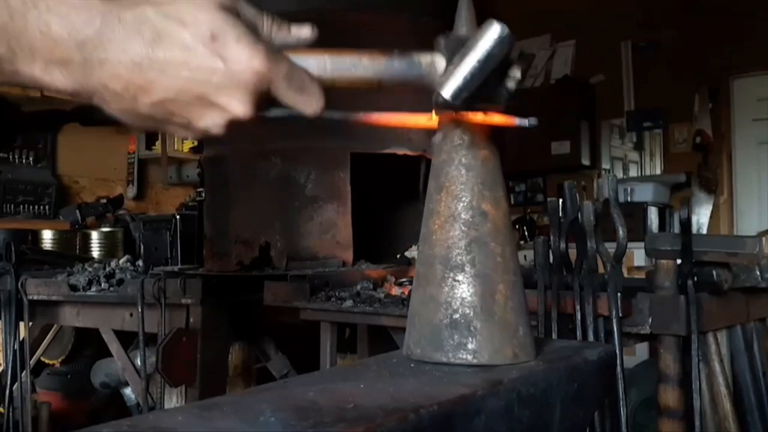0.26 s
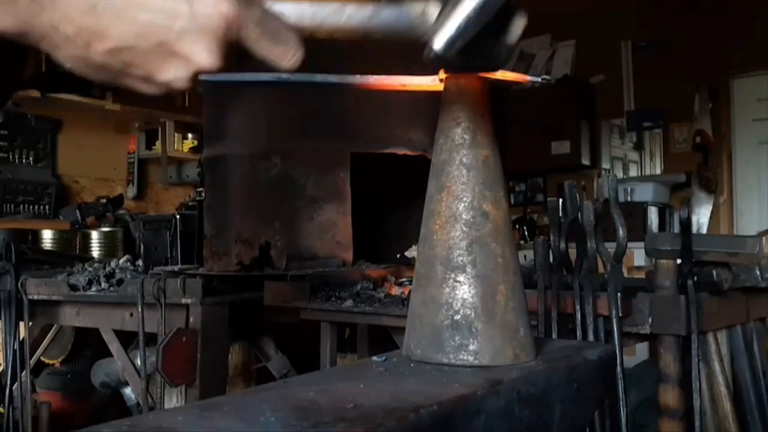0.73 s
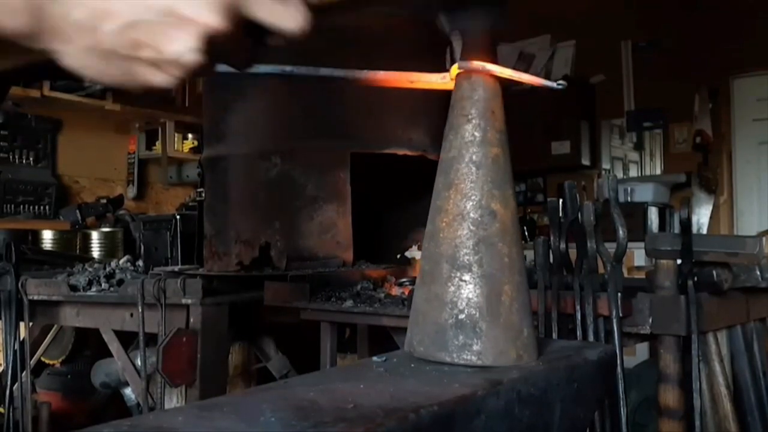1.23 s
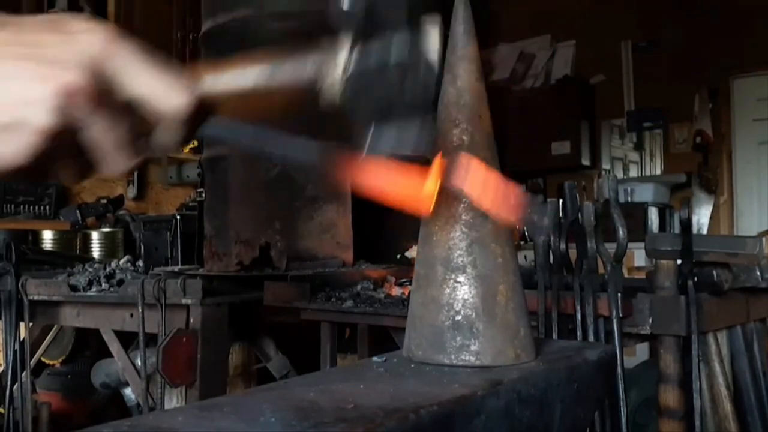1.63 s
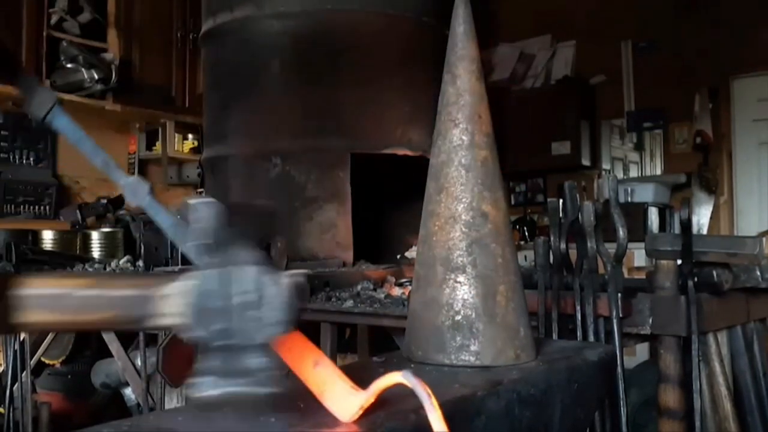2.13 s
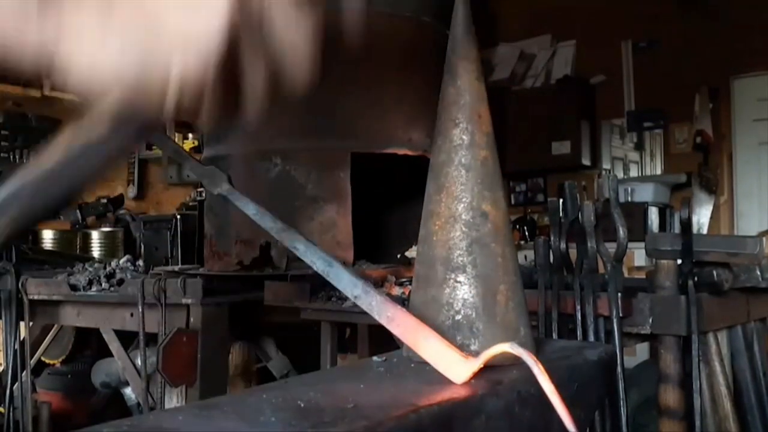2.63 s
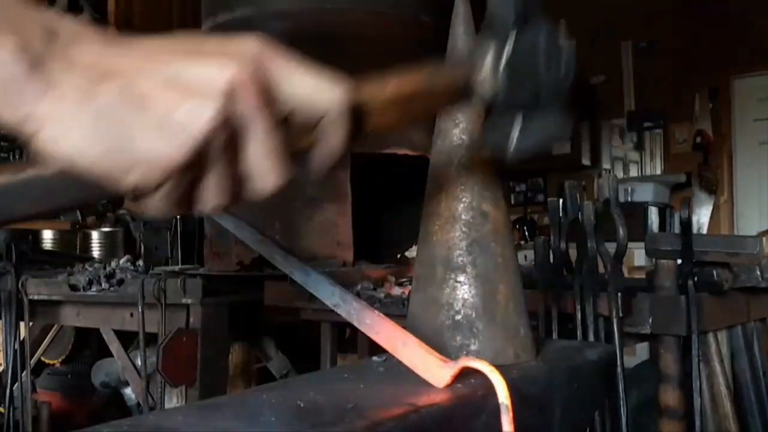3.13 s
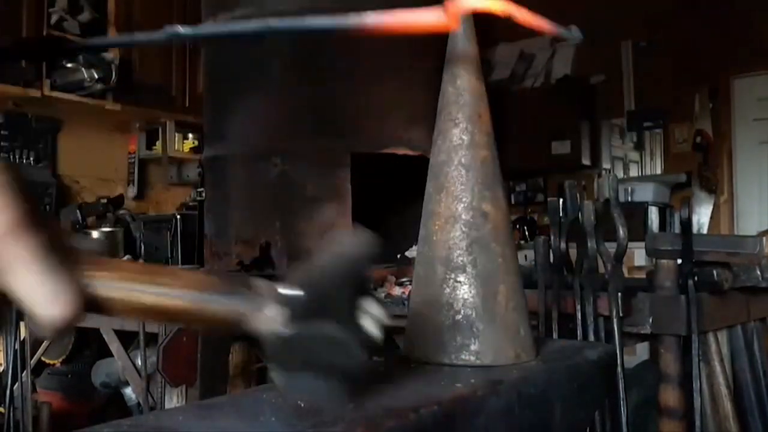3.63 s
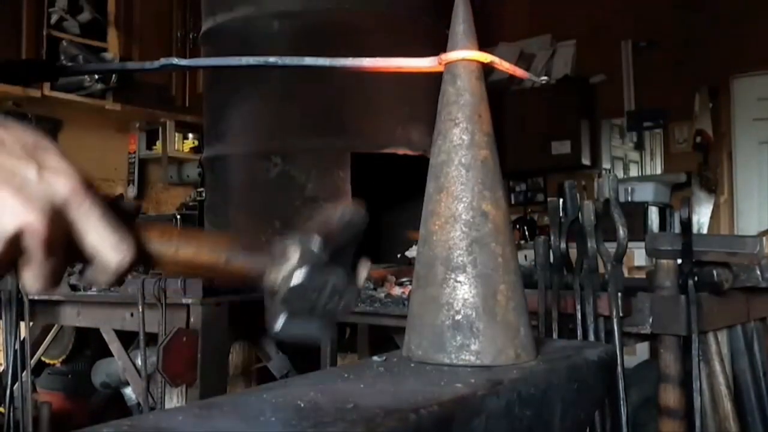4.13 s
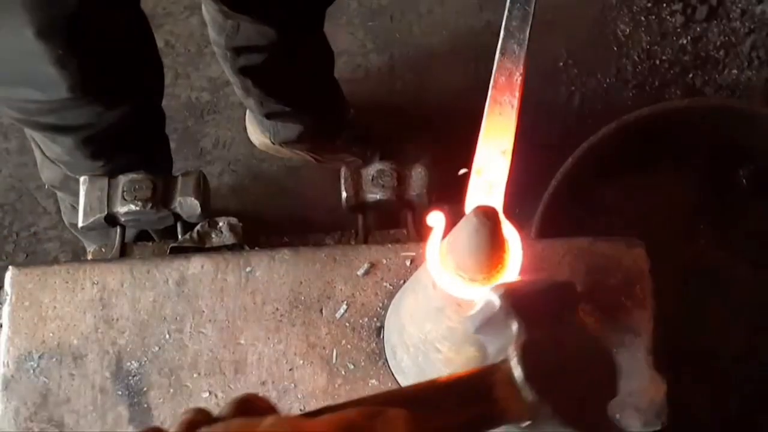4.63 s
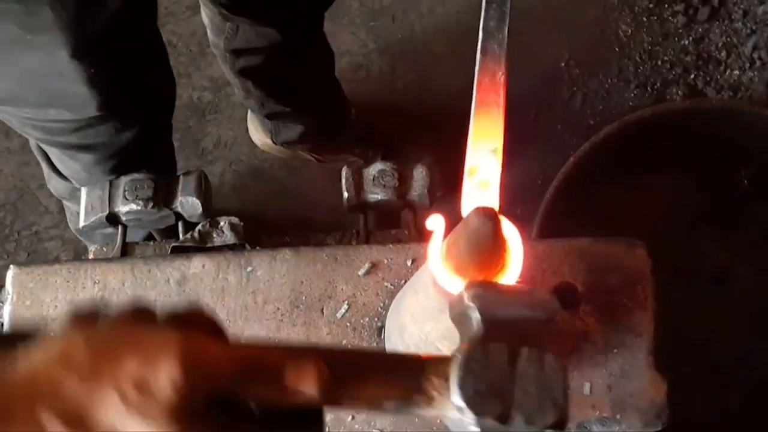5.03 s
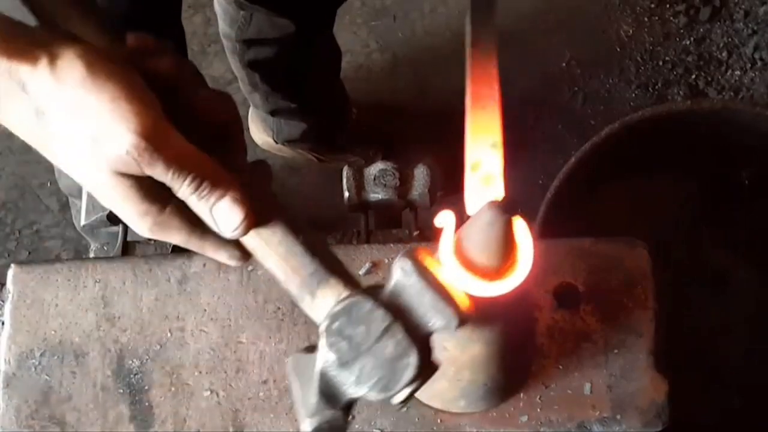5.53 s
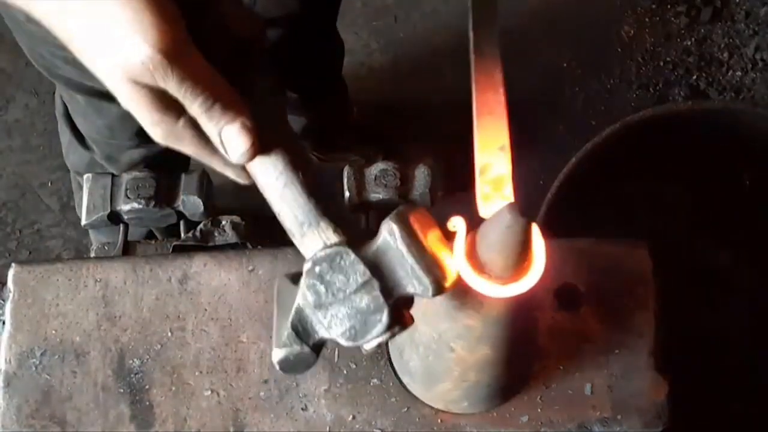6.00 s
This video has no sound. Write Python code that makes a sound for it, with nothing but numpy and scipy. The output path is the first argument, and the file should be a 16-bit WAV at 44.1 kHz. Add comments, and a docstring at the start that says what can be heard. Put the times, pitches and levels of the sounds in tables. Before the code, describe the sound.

Steel scrapes and knocks on a stand, then one hard ringing hammer blow, a bouncing run of ringing strikes, and lighter taps in a cluttered shed.

```python
"""A cluttered shed, heard close up in stereo: a smith bends a hot bar around a steel cone on an anvil.
Blows and bounces, hard to faint, are noise bursts with decaying modes of anvil, cone and hammer head; taps ring the bar.
The stand knocks in short sine notes and noise, the floor thumps low, and grainy noise drags steel over steel.
The shed answers with echoes and a short noise tail, over a low hum, faint hiss and a cricket."""
import sys
import numpy as np
from scipy import signal
from scipy.fft import rfft, irfft, next_fast_len
from scipy.io import wavfile
from scipy.ndimage import uniform_filter1d, map_coordinates

SR = 44100
rng = np.random.default_rng(int(sys.argv[2]) if len(sys.argv) > 2 else 0)


def file_out(sig):
    """Save sig as 16-bit WAV at sys.argv[1]."""
    # one column per channel
    cols = np.atleast_2d(sig).T
    # limit, then scale
    lim = np.clip(cols, -1, 1)
    pcm = np.round(lim * 32767).astype(np.int16)
    wavfile.write(sys.argv[1], SR, pcm)


def decibels_to_gain(level_db):
    """Convert a level in decibels to a linear amplitude gain (20 dB per decade)."""
    exponent = np.asarray(level_db, float) / 20
    return 10 ** exponent


N = 276050
T = np.arange(N) / SR  # time [s]

# hammer blows and bounces on steel, hard to faint, relative drive levels:
# (time [s], crack [dB], treble of the crack [dB], anvil ring [dB], hammer head ring [dB])
STEEL_BLOWS = [(2.165, 2, -24, -49, -29), (3.7276, 1.5, -20, -18, -24), (3.8184, -2.5, -25.5, -19, -32),
               (3.8961, -8.5, -36, -22, -36.5), (3.9428, -24, -44, -23.5, -61),
               (3.9786, -23.5, -47.5, -26, -65), (4.01, -44, -44.5, -42, -25),
               (4.7055, -31, -45.5, -37, -53.5), (5.122, -32, -43, -43.5, -51),
               (5.2919, -48, -54, -50, -90), (5.4961, -34.5, -41.5, -50, -42),
               (5.637, -49.5, -71, -58.5, -68), (5.7852, -12.5, -29, -55, -16),
               (6.0275, -18, -46, -39, -26)]
# dull knocks through the stand, relative drive levels:
# (time [s], knock [dB], knock pitch [Hz], clack [dB], floor thump [dB])
STAND_KNOCKS = [(0.049, -25.5, 567, -18.5, -51), (0.206, -37.5, 280, -27, -66), (0.261, -25, 248, -30, -56),
                (0.992, -48, 305, -30.5, -52), (1.138, -30.5, 246, -63, -51), (1.19, -34.5, 242, -39, -63),
                (1.422, -45, 400, -60, -84), (1.456, -19.5, 267, -22.5, -63), (1.462, -36, 302, -52, -56),
                (1.491, -24, 282, -39.5, -60), (1.53, -28, 283, -52, -55), (1.98, -42, 237, -33, -89),
                (2.164, -27, 614, -11, -41.5), (2.841, -33, 198, -33, -37.5), (2.894, -29, 739, -43.5, -49),
                (3.725, -14.5, 773, -12, -38), (3.818, -14, 710, -19, -43), (3.895, -14, 699, -9.5, -54),
                (3.942, -22, 720, -35, -46), (4.01, -25.5, 360, -22.5, -59),
                (4.072, -30, 290, -40.5, -76.5), (4.706, -20, 397, -27, -69.5),
                (4.719, -26, 227, -28.5, -60.5), (5.123, -18, 324, -22, -53), (5.498, -27, 447, -37, -84.5),
                (5.643, -40.5, 350, -60, -79), (5.699, -41, 289, -58, -78), (5.726, -30.5, 570, -59, -66),
                (5.786, -25, 543, -30, -55), (5.904, -32, 448, -32, -67), (6.024, -31.5, 706, -28, -70),
                (6.164, -29.5, 437, -57, -75), (6.185, -32, 422, -63, -64), (6.239, -27, 550, -58, -69)]
# ringing modes of the hammer head: (frequency [Hz], relative level [dB], t60 [s])
HAMMER_MODES = [(3255, -12, .2), (3295, -10, .25), (3325, -7, .3), (3357, -1, .36), (3440, -9, .3),
                (3465, -13, .2), (5394, -18, .2), (5520, -13, .18), (7790, -20, .15), (7950, -23, .1)]
# where the work is, seen from the microphone:
# (time [s], left minus right [dB], delay of left behind right [ms], send to the shed [dB])
WORK_PLACE = [(0, 1, -.29, 0.5), (1.13, 0.5, -0.13, -1.5), (2.2, 6, -0.18, 0.5), (3.7, 4, -.05, -4),
              (4.6, -0.5, -0.05, 1.5), (6.26, -3, -0.026, 2.5)]


def along(points, hz):
    """Read (Hz, value) points on a log-frequency axis."""
    point_hz, value = np.transpose(points)
    return np.interp(np.log(np.maximum(hz, 1)), np.log(point_hz), value)


def unit(x):
    """Scale to rms 1."""
    return x / np.sqrt(np.mean(x ** 2))


def coloured(points, channels=1):
    """Noise of rms 1 with the given spectrum."""
    size = next_fast_len(N)
    shape = decibels_to_gain(along(points, np.fft.rfftfreq(size, 1 / SR)))
    spectrum = rfft(rng.standard_normal((channels, size))) * shape
    return unit(irfft(spectrum, size)[:, :N])


def band(x, lo_hz, hi_hz):
    """Band-pass."""
    sos = signal.butter(2, [lo_hz, min(hi_hz, SR / 2.2)], "band", fs=SR, output="sos")
    return signal.sosfilt(sos, x)


def steep_noise(shape, lo_hz, hi_hz):
    """Noise of rms 1, band-passed twice for steep edges."""
    once = band(rng.standard_normal(shape), lo_hz, hi_hz)
    return unit(band(once, lo_hz, hi_hz))


def ring(x, hz, t60):
    """One damped mode; an impulse of 1 rings with amplitude 1."""
    r = 10 ** (-3 / (t60 * SR))
    w = 2 * np.pi * hz / SR
    return signal.lfilter([0, r * np.sin(w)], [1, -2 * r * np.cos(w), r * r], x)


def spikes(times, db):
    """Impulses at the given times."""
    x = np.zeros(N)
    np.add.at(x, np.minimum((np.asarray(times) * SR).astype(int), N - 1), decibels_to_gain(db))
    return x


def bursts(times, db, rise_s, fall_s):
    """An envelope that rises at each time and dies away, both exponentially."""
    up, down = np.exp(-1 / (rise_s * SR)), np.exp(-1 / (fall_s * SR))
    falling = signal.lfilter([1], [1, -down], spikes(times, db))
    return signal.lfilter([1 - up], [1, -up], falling)


def walk(rate):
    """Random levels held for 1 / rate seconds and slewed; rms 1."""
    hold = max(int(SR / rate), 1)
    steps = np.repeat(rng.standard_normal(N // hold + 1), hold)
    return unit(uniform_filter1d(steps, hold)[:N])


def background():
    """A wavering hum near 210 Hz with rumble that swells after blows, thin hiss, and a cricket's throbbing trill."""
    # spectrum of the shed air: (frequency [Hz], relative level [dB])
    air_spectrum = [(18, -64.5), (30, -39.5), (59, -5), (118, -8.5), (149, -32.5), (215, 0), (266, -9),
                    (486, -24.5), (1300, -39.5), (3770, -43.5), (5170, -37.5), (6050, -43.5), (7470, -40.5),
                    (14800, -47.5), (16000, -39)]
    # cricket trills: (start [s], end [s], level [dB])
    trills = [(0.592, 1.75, -71.5), (1.907, 3.7, -81), (4.25, 4.503, -76)]
    hum_db, hiss_db = -62.5, -73.5
    shaken_db, shaken_rise_s, shaken_fall_s = -36, 0.041, 0.044

    air = coloured(air_spectrum, channels=2)
    middle = band(air[0], 79, 670)
    sides = band(air[1], 100, 700) * np.array([[1], [-1]])
    rumble = unit(middle + decibels_to_gain(-15.5) * sides)
    tone = np.sin(2 * np.pi * np.cumsum(210 + 3 * walk(4.3)) / SR)
    hum = rumble * decibels_to_gain(0.79 * walk(2.6)) + decibels_to_gain(-12.0) * tone

    s, crack_db = np.transpose(STEEL_BLOWS)[:2]
    shaken = decibels_to_gain(shaken_db) * bursts(s, crack_db, shaken_rise_s, shaken_fall_s) * rumble
    hiss = unit(band(air, 1100, 17000)) * decibels_to_gain(2.0 * walk(22) + 1.5 * walk(1.8))

    chirp = steep_noise((2, N), 5150, 5550) * decibels_to_gain(3.0 * walk(28))
    wing = np.sin(np.pi * np.cumsum(22 + 3 * walk(3.7)) / SR) ** 4  # one pulse per wing stroke, about 22 a second
    chirp = unit(chirp * (.2 + 2 * wing))
    sings = sum(decibels_to_gain(db) * np.clip(np.minimum(T - start, end - T) / 0.21, 0, 1) for start, end, db in trills)
    return decibels_to_gain(hum_db) * hum + shaken + decibels_to_gain(hiss_db) * hiss + sings * chirp


def shed_tail():
    """Impulse response per ear: a few wall echoes and a dense tail whose bass lingers longest."""
    # decay of the tail: (frequency [Hz], t60 [s])
    decay = [(50, 0.84), (250, 0.5), (1000, 0.48), (2500, 0.39), (6000, 0.41), (14000, 0.47)]
    # colour of the tail: (frequency [Hz], relative level [dB])
    colour = [(50, -1.5), (300, 2), (1500, 4.5), (5000, 5), (15000, -6)]
    # first wall echoes: (delay [s], level at the stronger ear [dB])
    echoes = [(.011, -9), (.0173, -14), (.024, -11.5)]

    t = T[:int(.8 * SR)]
    noise = rng.standard_normal((2, len(t)))
    shared = noise.mean(axis=0) * np.sqrt(2)
    tail = 0
    for hz in 45 * 2 ** np.arange(0, 8.5, .5):  # half-octave bands
        alike = np.clip(1 - hz / 750, 0, 1)  # long waves reach both ports alike
        blend = np.sqrt(alike) * shared + np.sqrt(1 - alike) * noise
        part = band(blend, hz / 2 ** .25, hz * 2 ** .25)
        tail = tail + decibels_to_gain(along(colour, hz)) * part * 10 ** (-3 * t / along(decay, hz))
    tail = decibels_to_gain(-29.5) * tail * np.clip(t / 0.023, 0, 1)
    for k, (delay, db) in enumerate(echoes):
        late = k % 2 * 9  # every other echo comes 9 samples later
        tail[:, int(delay * SR) + late] += decibels_to_gain(db) * np.array([1, .6])
        tail = tail[::-1]  # swap ears, so that successive echoes favour opposite sides
    return tail


def ports(x):
    """The direct sound reaches the two microphone ports at different moments and levels."""
    s, pan_db, lag_ms, _ = np.transpose(WORK_PLACE)
    half_lag = np.interp(T, s, lag_ms) * SR / 1000 / 2  # samples
    pair = np.array([map_coordinates(x, [np.arange(N) - side * half_lag], order=3) for side in (1, -1)])
    pan_db = np.interp(T, s, pan_db)
    return pair * decibels_to_gain(np.array([pan_db, -pan_db]) / 2)


def thump():
    """The floor under the stand swings near 50 Hz, builds up late and is alike in both ears."""
    s, thump_db = np.transpose(STAND_KNOCKS)[[0, -1]]
    return decibels_to_gain(3) * bursts(s, thump_db, 0.022, 0.072) * np.sin(2 * np.pi * 51. * T)


def knocks():
    """The stand is hit: short woody sine notes with a dull noise rattle and a brighter clack."""
    s, db, pitch, clack_db, _ = np.transpose(STAND_KNOCKS)
    note = np.zeros(N)
    t = T[:int(.06 * SR)]
    for start, level_db, hz in zip((s * SR).astype(int), db, pitch):
        envelope = np.exp(-t / 0.0038) * (1 - np.exp(-t / 0.0013))
        wave = decibels_to_gain(level_db) * np.sin(2 * np.pi * hz * t) * envelope
        note[start:start + len(t)] += wave[:N - start]
    rattle = bursts(s, db, 0.0011, 0.027) * steep_noise(N, 150, 1100)
    clack = bursts(s, clack_db, 0.00041, 0.022) * steep_noise(N, 800, 1900)
    return np.array([decibels_to_gain(-14.5) * rattle + decibels_to_gain(-14.5) * clack, decibels_to_gain(3.5) * note])  # noisy, ringing


def rubbing(rows, resonances, bass_db, grain_db):
    """Rough surfaces catch and slip: grainy noise through the resonances of what slides."""
    swell_depth_db = 30  # this far down one swell before, and one fade after, the loudest moment
    grit = rng.standard_normal(N) * decibels_to_gain(grain_db * (walk(250) + 1.1 * walk(45)))
    peaks = sum(decibels_to_gain(db) * band(grit, hz - w / 2, hz + w / 2) for hz, w, db in resonances)
    rasp = band(grit, 560, 3650) + peaks
    body = unit(rasp) + decibels_to_gain(bass_db) * unit(band(grit, 130, 700))
    treble = unit(band(grit, 3300, 11000))
    out = np.zeros(N)
    for s, swell_s, fade_s, db, treble_db in rows:
        away = (T - s) / np.where(T < s, swell_s, fade_s)
        level = decibels_to_gain(db - swell_depth_db * np.minimum(away ** 2, 10))
        out += level * (body + decibels_to_gain(treble_db) * treble)
    return out


def scrapes():
    """Steel dragged over steel, and softer, smoother rustles of scale and sleeves."""
    # steel drags: (loudest at [s], swell [s], fade [s], level [dB], treble over that level [dB])
    drags = [(.09, 0.19, 0.095, -30.5, -16.5), (.216, 0.014, 0.022, -36, -1.5),
             (.266, 0.018, 0.13, -51.5, -3.5), (.474, .014, 0.15, -32.5, -12.5),
             (.525, 0.08, 0.038, -27.5, -21.5)]
    # soft rustles: (loudest at [s], swell [s], fade [s], level [dB], treble over that level [dB])
    rustles = [(.33, 0.16, 0.15, -51, -6), (1.005, 0.01, 0.12, -44.5, -2), (1.25, 0.13, 0.19, -69.5, -17),
               (1.43, 0.073, 0.09, -65, 2), (1.815, 0.083, 0.11, -45.5, -11.5),
               (2.5, 0.19, 0.14, -55.5, -16), (2.87, 0.037, 0.14, -41.5, -2), (4.545, 0.13, 0.095, -58, -4),
               (5.33, .06, .2, -61.5, -5.5)]
    # resonances of the sliding steel: (frequency [Hz], width [Hz], relative level [dB])
    rasp_bands = [(1496, 890, 4.5), (844, 630, -1)]
    steel = rubbing(drags, rasp_bands, bass_db=-10.5, grain_db=2.5)
    return steel + rubbing(rustles, [], bass_db=-1, grain_db=1.0)


def struck(times, db, modes, scatter_db, waver_db):
    """Every hit wakes each mode a little differently; each ring's level wavers irregularly as it dies away."""
    chance = rng.standard_normal((len(times), len(modes)))
    out = np.zeros(N)
    for (hz, mode_db, t60), luck in zip(modes, chance.T):
        hits = spikes(times, db + mode_db + scatter_db * luck)
        out += decibels_to_gain(waver_db * walk(70)) * ring(hits, hz, t60)
    return out


def crack(s, crack_db, snap_db, fall_s):
    """The contact: a hard click, a few milliseconds of splintering, then the dense clatter of everything shaken."""
    # main spectrum of the contact: (frequency [Hz], relative level [dB])
    body_spectrum = [(290, -50.5), (500, -20), (900, -19), (1220, -6.5), (2270, -2), (2550, -5.5),
                     (3500, -8), (5000, -22), (6500, -53), (11000, -120)]
    # its treble spectrum: (frequency [Hz], relative level [dB])
    snap_spectrum = [(1760, -34.5), (3000, 2), (5480, 0), (10100, -6), (11900, -6.5), (13000, -13.5),
                     (14600, -8.5), (16000, -25)]
    tick = band(spikes(s, crack_db), 1200, 4400)
    click = decibels_to_gain(11.0) * tick + decibels_to_gain(8.0) * band(spikes(s, snap_db), 4000, 13000)
    # each envelope is a short splintering plus a quieter, slower clatter
    body = decibels_to_gain(-6) * bursts(s, crack_db, 0.0009, fall_s) + decibels_to_gain(-23.5) * bursts(s, crack_db, 0.012, 0.04)
    snap = decibels_to_gain(3.0) * bursts(s, snap_db, 0.00037, fall_s) + decibels_to_gain(-14) * bursts(s, snap_db, 0.0018, 0.006)
    return click + body * coloured(body_spectrum)[0] + snap * coloured(snap_spectrum)[0]


def taps():
    """Light taps on the hot bar: a longer contact than a blow's, and the loose ring of bar and hammer head."""
    # taps, relative drive levels:
    # (time [s], crack [dB], treble of the crack [dB], bar ring [dB], hammer head ring [dB])
    light_taps = [(.206, -35, -44, -50, -48), (.991, -57, -37.5, -47.5, -40),
                  (1.978, -28.5, -38.5, -56.5, -51), (2.838, -30.5, -27, -43, -41)]
    # ringing modes of the bar: (frequency [Hz], relative level [dB], t60 [s])
    bar_modes = [(740, -7, .2), (2330, -2, .33), (2430, 0, .36), (2500, -3, .3), (2560, 0, .36),
                 (3480, -3, .25), (5330, -3, .3)]
    s, crack_db, snap_db, bar_db, head_db = np.transpose(light_taps)
    bar = struck(s, bar_db, bar_modes, 2.0, 5.0)
    head = struck(s, head_db, HAMMER_MODES, 2.0, 4.0)
    contact = crack(s, crack_db, snap_db, 0.0058)
    return np.array([decibels_to_gain(2.5) * contact, decibels_to_gain(3) * bar + decibels_to_gain(-2.5) * head])  # noisy, ringing


def blows():
    """Blows and bounces, hard to faint: the crack, and the ring of anvil, cone, hammer head and its high face."""
    # ringing modes of the cone: (frequency [Hz], relative level [dB], t60 [s])
    cone_modes = [(1288, -6, .24), (1600, -7, .15), (2026, -3, .26), (2316, -7, .22), (2452, -11, .2),
                  (2556, 1, .27), (2910, -10, .25), (3049, -5, .25), (3400, -12, .12), (4065, -16, .15),
                  (4565, -9, .06)]
    # ringing modes of the hammer face: (frequency [Hz], relative level [dB], t60 [s])
    face_modes = [(11720, -10, .07), (12250, -9, .1)]
    # ringing modes of the anvil: (frequency [Hz], relative level [dB], t60 [s])
    anvil_modes = [(1012, -11, .2), (1133, -8, .22), (1288, -9, .2), (1435, -10, .16), (1600, -5, .13),
                   (1655, -5, .07), (1810, -11, .15), (2040, -8, .2), (2305, -9, .16), (3380, -1, .03)]
    cone_hit_s, cone_hit_db = 2.166, -11.5  # one hit catches the cone itself
    cone_under_anvil_db = -19  # blows also wake it through the anvil

    s, crack_db, snap_db, anvil_db, head_db = np.transpose(STEEL_BLOWS)
    cone_s = np.append(s, cone_hit_s)
    cone_db = np.append(anvil_db + cone_under_anvil_db, cone_hit_db)
    cone = struck(cone_s, cone_db, cone_modes, 1.7, 4.0)
    anvil = struck(s, anvil_db, anvil_modes, 3.3, 5.1)
    face = struck(s, snap_db, face_modes, 2.5, 5.0)
    head = struck(s, head_db, HAMMER_MODES, 1.5, 2.6) + decibels_to_gain(2) * face
    contact = crack(s, crack_db, snap_db, 0.0037)
    return np.array([contact, decibels_to_gain(-2.5) * (anvil + cone) + decibels_to_gain(-3.0) * head])  # noisy, ringing


def scene():
    """Work at the anvil, direct and through the shed, over the background."""
    ring_to_room_db = -4.5  # rings and knock notes are sent more weakly to the shed, so they sound drier
    noisy, ringing = blows() + taps() + knocks()
    noisy = noisy + scrapes()
    s, shed_db = np.transpose(WORK_PLACE)[[0, -1]]
    to_room = (noisy + decibels_to_gain(ring_to_room_db) * ringing) * decibels_to_gain(np.interp(T, s, shed_db))
    shed = signal.fftconvolve(to_room[None], shed_tail(), axes=1)[:, :N]
    return ports(noisy + ringing) + shed + thump() + background()


def low_pass(x):
    """Removes everything above the highest recorded frequency."""
    return signal.sosfilt(signal.butter(12, 16420, fs=SR, output="sos"), x)


def record(dry):
    """The microphone drops the deepest bass, the loudest peaks flatten just under full scale, the top is cut."""
    heard = signal.sosfilt(signal.butter(4, 38, "high", fs=SR, output="sos"), dry)
    flattened = np.clip(heard, -.92, .92)
    mix = signal.sosfilt(signal.butter(8, 14800, fs=SR, output="sos"), flattened)
    return low_pass(mix)


dry = scene()
out = record(dry)
file_out(out)
```